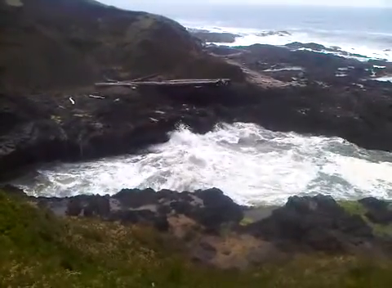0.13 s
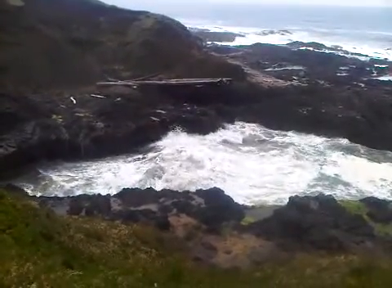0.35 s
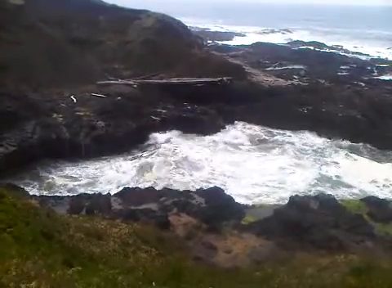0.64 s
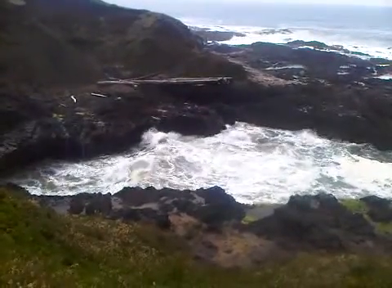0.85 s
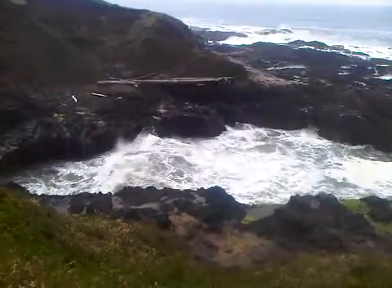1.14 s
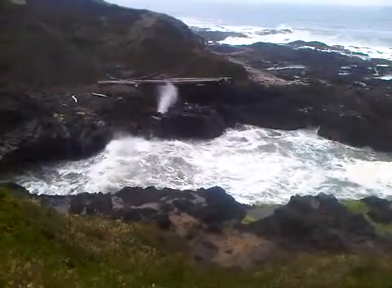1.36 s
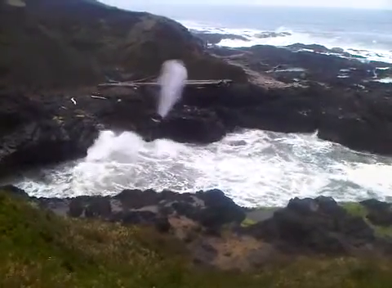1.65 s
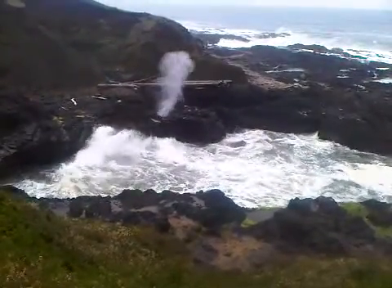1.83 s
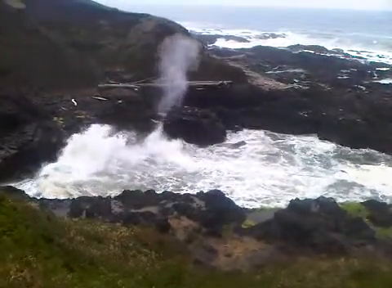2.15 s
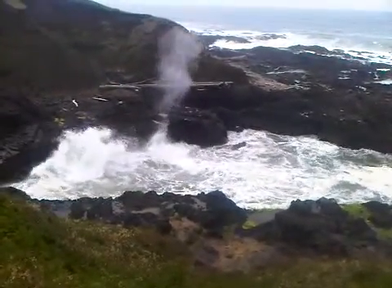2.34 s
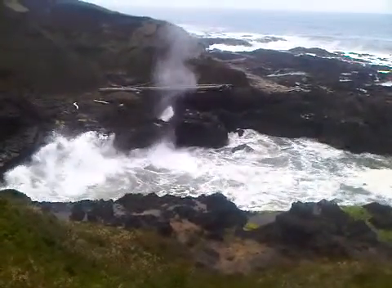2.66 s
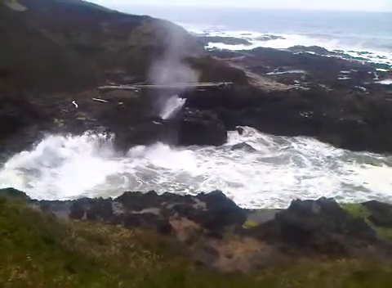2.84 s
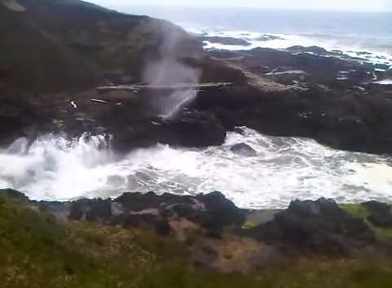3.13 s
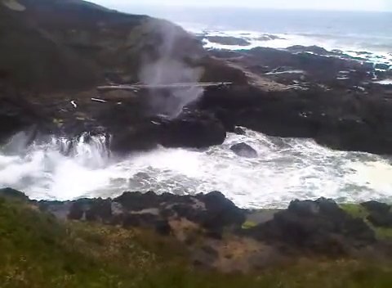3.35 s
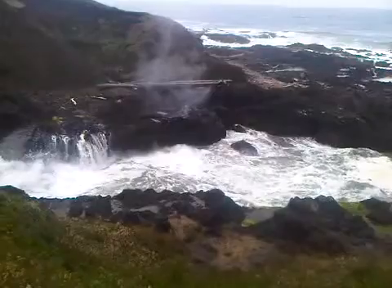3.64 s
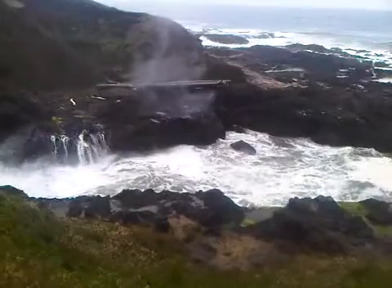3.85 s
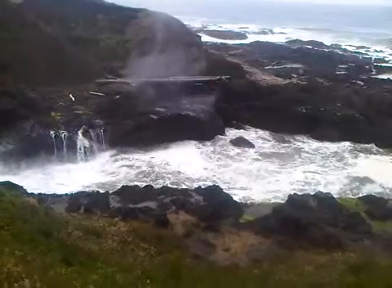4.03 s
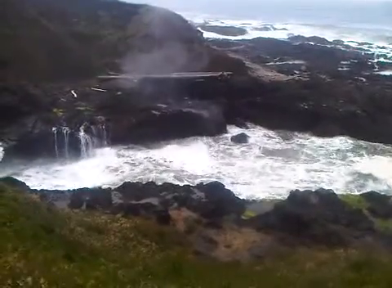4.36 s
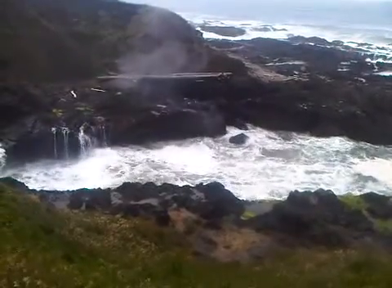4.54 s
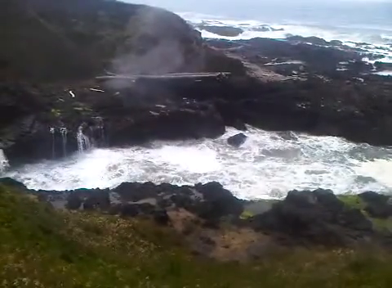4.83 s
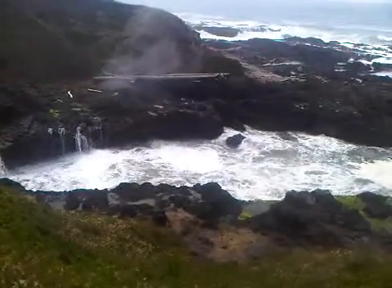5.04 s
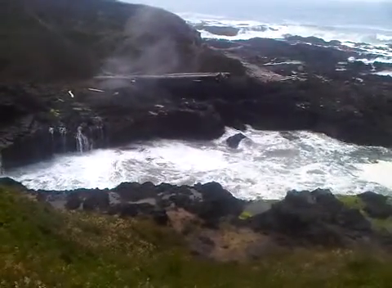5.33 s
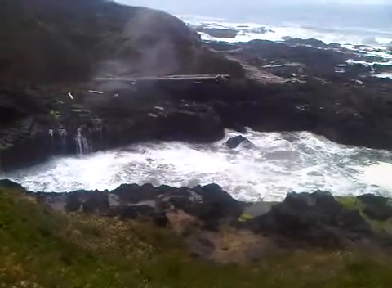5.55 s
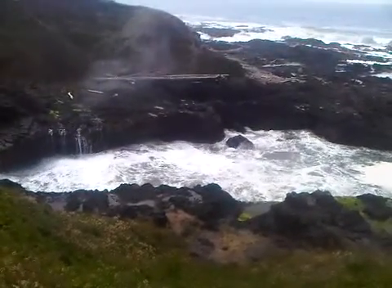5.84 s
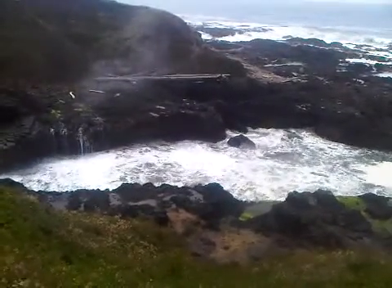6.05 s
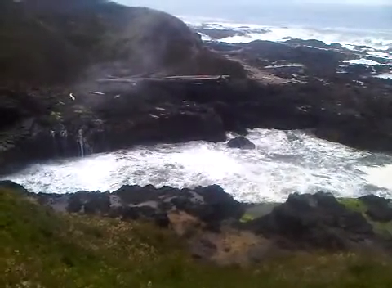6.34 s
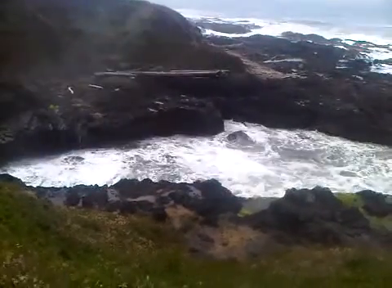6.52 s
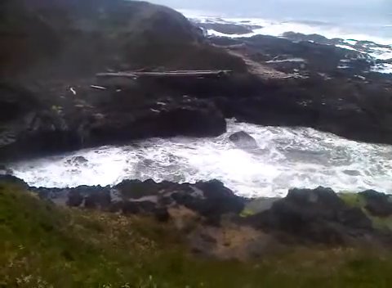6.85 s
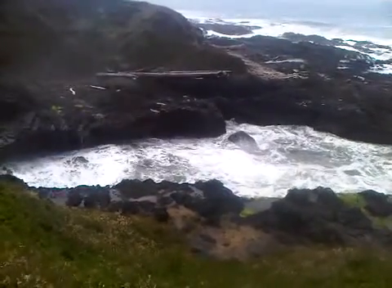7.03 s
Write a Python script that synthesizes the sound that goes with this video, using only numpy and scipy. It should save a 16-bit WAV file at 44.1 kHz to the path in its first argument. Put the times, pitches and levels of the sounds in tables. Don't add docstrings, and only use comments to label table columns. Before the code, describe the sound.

Churning water in a rocky cove, heard from well back: low boom, hollow wash and steady spray hiss. Light wind puffs at first, a wave slap swelling near 1.8 seconds, then brighter spray around 3 to 4 seconds. Hard wind jets thump the exposed pocket-camera microphone from about 2.7 seconds, densest from 4 to 5, easing after 6. The sound is mono, dull on top and slightly grainy.

```python
import sys
import numpy as np
from scipy import signal
from scipy.fft import rfft, irfft, next_fast_len
from scipy.io import wavfile
from scipy.ndimage import uniform_filter1d, map_coordinates

SR = 44100
rng = np.random.default_rng(int(sys.argv[2]) if len(sys.argv) > 2 else 0)


def ratio(d):
    e = np.asarray(d, float) / 20
    return 10 ** e


def put_to_file(sound):
    columns = np.atleast_2d(sound).T
    safe = np.clip(columns, -1, 1)
    whole_steps = np.round(safe * 32767)
    wavfile.write(sys.argv[1], SR, whole_steps.astype(np.int16))


N = 317079
T = np.arange(N) / SR

# time in seconds, spray level in dB.
CHURN = [(0, -64), (.64, -62.5), (1.25, -63.5), (2.0, -61.5), (2.65, -58.5), (3.1, -55.5), (3.4, -56.5),
         (3.65, -59.5), (3.95, -56.5), (4.6, -60.5), (5.15, -62.5), (6.1, -64), (7.19, -65.5)]
# frequency in Hz, level in dB per Hz.
BOOM_COLOUR = [(20, -16), (40, 8), (90, -5), (200, 4), (400, -22.5)]
# frequency in Hz, level in dB per Hz.
WASH_COLOUR = [(60, -31), (150, -9.5), (350, 2.5), (700, -3.5), (1050, 0), (1350, -5), (1650, -6.5),
               (1900, -10.5), (3000, -20), (5000, -35.5)]
# frequency in Hz, level in dB per Hz.
SPRAY_COLOUR = [(800, -25.5), (2000, 0), (2800, 0), (3250, -1.5), (3600, 0), (4400, -1.5), (5100, -4.5),
                (5700, -3), (6400, -6), (7200, -9), (9000, -11.5)]
# time in seconds, level in dB.
BREEZE = [(0, -49), (.14, -52), (1.26, -55), (1.55, -49), (1.78, -42), (1.96, -49.5), (2.38, -52.5),
          (2.76, -44.5), (3.64, -43.5), (3.94, -48), (4.1, -42), (4.75, -42), (4.85, -46), (5.1, -43),
          (5.35, -45.5), (5.8, -42), (6.59, -43.5), (7.19, -48)]
# start in seconds, end in seconds, level in dB, eddy rate in Hz.
JETS = [(0.109, 0.151, -44.5, 140.5), (0.719, 0.762, -44.5, 120.5), (1.332, 1.372, -42, 180.3),
        (1.408, 1.454, -40, 193.1), (1.552, 1.589, -38.5, 183), (2.749, 2.788, -32.5, 231),
        (2.798, 2.838, -30, 165.3), (3.034, 3.052, -40, 279), (3.481, 3.498, -37.5, 260.7),
        (3.503, 3.539, -26, 214.4), (3.904, 3.938, -28.5, 300.2), (3.941, 4.017, -25, 304),
        (4.193, 4.324, -29, 256.1), (4.329, 4.506, -33, 240.5), (4.5, 4.66, -29.5, 165.5),
        (4.662, 4.765, -29, 194.6), (4.813, 4.845, -34, 202.6), (4.853, 4.864, -25, 300.5),
        (4.967, 5.012, -30.5, 228.8), (5.031, 5.068, -28, 220.6), (5.087, 5.104, -28, 268.7),
        (5.803, 5.837, -31, 280.3), (5.834, 5.853, -27, 268.4), (5.865, 5.884, -26.5, 290.1),
        (5.886, 5.908, -40, 260.8), (5.943, 5.962, -41, 333.2), (5.992, 6.027, -44, 328.3),
        (6.063, 6.073, -26, 259.7)]
# time in seconds, peak in dB,
# eddy rate in Hz.
EDDIES = [(0.7365, -28, 122), (0.9435, -32, 177), (1.2797, -31, 145), (1.7014, -24, 213),
          (1.829, -28.5, 221), (3.3663, -24.5, 227), (3.435, -33, 327), (4.062, -24.5, 202),
          (4.112, -30.5, 400), (4.944, -22.5, 230), (5.2134, -34.5, 181.4), (5.33, -35, 165),
          (5.5573, -28.5, 255.7), (5.674, -30, 213), (5.7321, -24.5, 232), (5.754, -32, 396),
          (5.959, -25.5, 400), (5.985, -17.5, 400), (5.9958, -20, 428), (6.0143, -16, 347),
          (6.2696, -34, 277.9), (6.4362, -26.5, 151.7), (6.4519, -27.5, 307), (6.5991, -30.5, 247),
          (6.7652, -29.5, 244), (6.782, -31, 256), (6.89, -29.5, 215), (7.034, -31.5, 214),
          (7.1, -30.5, 293)]
# time in seconds, peak in dB.
SLAMS = [(1.3494, -23.5), (1.4244, -25), (1.4458, -23.5), (1.5567, -24), (2.7645, -20.5), (2.7774, -18.5),
         (2.7899, -21), (2.8064, -17), (3.036, -19.5), (3.512, -20.5), (3.5294, -18), (3.979, -16),
         (4.2214, -21.5), (4.2707, -11), (4.3085, -18.5), (4.4431, -16.5), (4.507, -19.5), (4.7492, -12.5),
         (4.828, -16), (4.9825, -15), (5.012, -24.5), (5.0991, -12.5), (5.8221, -18), (5.844, -18),
         (5.8768, -19), (6.0662, -25.5)]
# time in seconds, peak in dB.
FLICKS = [(2.754, -32.5), (2.838, -31.5), (3.035, -27), (3.225, -35), (3.435, -35.5), (3.513, -19.5),
          (3.907, -22.5), (3.949, -23.5), (3.981, -24.5), (4.22, -29.5), (4.329, -27.5), (4.394, -25),
          (4.475, -32.5), (4.49, -25), (4.507, -21), (4.663, -30.5), (4.854, -28.5), (4.944, -34),
          (5.012, -22.5), (5.098, -30), (5.727, -31.5), (5.787, -34.5), (5.813, -27.5), (5.879, -23.5),
          (5.9, -31), (6.066, -26.5), (6.27, -33.5)]
# frequency as a multiple of eddy rate, level in dB per Hz.
SWIRL_COLOUR = [(.1, -40.5), (.4, -5.5), (.7, 1.5), (1.2, -2), (2, -9), (3.5, -22.5), (6, -35), (12, -57.5),
                (30, -90)]
# start in seconds, end in seconds, pitch in Hz, level in dB.
WHISTLE = (2.24, 2.41, 826, -64)
# time in seconds, peak in dB, pitch in Hz, 60 dB decay in seconds.
CASE_TICK = (6.5755, -30, 4900, .0014)
# start in seconds, end in seconds.
DROPOUT = (6.5926, 6.5965)
# frequency in Hz, gain in dB.
CONVERTER = [(5, -1), (7100, 0), (7500, -4.5), (7800, -12), (8000, -14), (8100, -88.5)]
# start in seconds, shortage from 0 to 1, shortage of every second frame after from 0 to 1.
LEAN_FRAMES = [(.183, .05, .02), (.311, .13, .02), (.951, .12, .02), (1.143, .06, 0), (1.271, .32, 0),
               (1.399, .22, .07), (1.719, .11, .08), (2.359, .45, .03), (2.743, .24, .04),
               (3.191, .08, .06), (3.511, .38, .02), (3.895, .17, .04), (4.215, .23, .15), (4.855, .26, 0),
               (4.983, .3, .11), (5.815, .19, .05), (6.007, .13, .08), (6.263, .43, .16), (7.031, .31, .1)]

CALM_DB = -65.5
FRAME_S, FIRST_EDGE_S = .064, .057


def unit(x):
    return x / np.sqrt(np.mean(x ** 2) + 1e-20)


def curves(rows):
    s, *cols = np.transpose(rows)
    return [np.interp(T, s, c) for c in cols]


def wobble(rate):
    knots = rng.standard_normal(int(N * rate / SR) + 4)
    return map_coordinates(knots, [T * rate])


def coloured(x, points, scale=1):
    m = next_fast_len(len(x) + 8192)
    f, level_db = np.transpose(points)
    log_hz = np.log(np.fft.rfftfreq(m, 1 / SR) + 1)
    gain = ratio(np.interp(log_hz, np.log(f * scale), level_db, -90, -130))
    return unit(irfft(rfft(x, m) * gain, m)[:len(x)])


def patchy(depth_db):
    z = signal.stft(rng.standard_normal(N + 512), nperseg=512)[2]
    field = uniform_filter1d(rng.standard_normal(z.shape), size=5, axis=0)
    field = uniform_filter1d(field, size=12, axis=1)
    return signal.istft(z * ratio(depth_db * unit(field)), nperseg=512)[1][:N]


def gate(start, end, edge):
    return np.clip(np.minimum(T - start, end - T) / edge + .5, 0, 1)


def wave_on_ledge():
    since = T - 1.756
    return np.clip(np.minimum(1 + since / 0.29, 1 - since / 0.31), 0, 1)


def spray_with_mist(spray, churn_db):
    above_mist_hz = signal.butter(N=2, Wn=5060, btype="high", fs=SR, output="sos")
    top = signal.sosfiltfilt(above_mist_hz, spray)
    return spray + (ratio(-1.5 + 0.38 * (churn_db - CALM_DB)) - 1) * top


def surf():
    churn_db, = curves(CHURN)
    slap = wave_on_ledge()
    wash_db = -58 + 0.7 * (churn_db - CALM_DB) + 8 * slap
    spray_db = churn_db + 3.5 * slap
    heave = wobble(5)
    wash_gain = ratio(wash_db + 2.5 + 0.46 * heave + 0.38 * wobble(14))
    wash = wash_gain * coloured(patchy(depth_db=1.0), WASH_COLOUR)
    spray = ratio(spray_db + 1.5 + 0.51 * heave) * coloured(patchy(depth_db=0.75), SPRAY_COLOUR)
    boom = ratio(wash_db - 5.0) * coloured(patchy(depth_db=3.0), BOOM_COLOUR)
    return boom + wash + spray_with_mist(spray, churn_db)


def wind():
    jet_hz = np.full(N, 200.)
    for start, end, db, hz in JETS:
        jet_hz[T > start - .01] = hz
    return breeze() + jets(jet_hz) + thumps(jet_hz) + flicks()


def jets(jet_hz):
    force = np.zeros(N)
    for start, end, db, hz in JETS:
        force = np.maximum(force, ratio(db) * gate(start, end, edge=0.0045))
    return force * turbulence(uniform_filter1d(jet_hz, size=400), lumpy_db=4.0, even=0.52)


def thumps(jet_hz):
    out, t = np.zeros(N), np.arange(-1500, 1500) / SR
    eddies = EDDIES + [(s, db, jet_hz[round(s * SR)]) for s, db in SLAMS]
    for (s, db, hz), turn in zip(eddies, rng.random(len(eddies))):
        shape = np.exp(-(t * hz / 0.59) ** 2)
        swing = np.cos(2 * np.pi * hz * t + 1.1 * (turn - .5))
        sharpness = hz / 700 * np.cos(2 * np.pi * 1.96 * hz * t) * shape ** 2
        out[round(s * SR) - 1500:][:len(t)] -= ratio(db - 4.5) * shape * (swing + sharpness)
    return out


def flicks():
    hz, t = 450, np.arange(-1500, 1500) / SR
    kicks = np.zeros(N)
    for s, db in FLICKS:
        kicks[round(s * SR)] = ratio(db)
    flick = -np.exp(-(t * hz / 0.5) ** 2) * np.cos(2.4 * np.pi * hz * t)
    return signal.fftconvolve(kicks, flick, "same")


def breeze():
    level_db, = curves(BREEZE)
    rate_hz = 150.3 * ratio(.15 * np.clip(level_db + 52, 0, 9))
    return ratio(level_db + 1.62 * wobble(30)) * turbulence(rate_hz, lumpy_db=4, even=0.19)


def turbulence(rate_hz, lumpy_db, even):
    place = np.cumsum(rate_hz / 200)
    lumps = rng.standard_normal(2 * N // 64 + 1).repeat(64)[:2 * N]
    kicks = rng.standard_normal(2 * N) * ratio(lumpy_db * lumps)
    pattern = coloured(kicks, SWIRL_COLOUR, scale=200.3)
    air = map_coordinates(pattern, [np.minimum(place, 2 * N - 2)], order=1)
    swing = np.abs(uniform_filter1d(air ** 2, size=900)) + 1e-3
    return unit(air / swing ** (np.clip(even, 0, 1) / 2))


def slot_whistle():
    start, end, hz, db = WHISTLE
    return ratio(db + 5) * gate(start, end, edge=.03) * np.sin(2 * np.pi * hz * T + .8 * wobble(30))


def case_tick():
    s, db, hz, t60 = CASE_TICK
    t = np.maximum(T - s, 0)
    return -ratio(db + 4.0 - 60 * t / t60) * np.sin(2 * np.pi * hz * t)


def scene():
    return (surf() + wind() + slot_whistle() + case_tick())[None]


def bit_shortage(frames, floor_db, odd_db, lean_db, shortage_db):
    luck = rng.uniform(.6, 1.3, frames)
    step_db = floor_db + odd_db * luck
    for s, shortage, after in LEAN_FRAMES:
        first = round((s - FIRST_EDGE_S) / FRAME_S) + 1
        step_db[first::2] = lean_db + shortage_db * np.sqrt(after * luck[first::2])
        step_db[first + 1::2] = floor_db
        step_db[first] = lean_db + shortage_db * np.sqrt(min(shortage, .36))
    return step_db


def thrifty_camera(x):
    hz, t, z = signal.stft(x, SR, window="cosine", nperseg=706)
    frame = np.floor((t - FIRST_EDGE_S) / FRAME_S).astype(int) + 1
    frames = frame.max() + 1
    size = np.abs(z)
    hiss = uniform_filter1d(np.median(size[(hz > 3000) & (hz < 6500)], axis=0), size=40)
    step_db = bit_shortage(frames, floor_db=-11, odd_db=2.5, lean_db=-10, shortage_db=31)
    bands = rng.standard_normal((len(z) // 3 + 1, frames)).repeat(3, axis=0)[:len(z)]
    colour = (np.median(size, axis=1) / np.median(hiss) + 1e-9)[:, None] ** .22
    step = hiss * np.minimum(colour, 1) * ratio(step_db + 2.8 * bands)[:, frame]
    lines = np.round(size / step - .1) * step * np.exp(1j * np.angle(z))
    fold, k = 128, np.arange(1, 16)[:, None]
    mirror = np.conj(lines[fold - k[:, 0]]) * np.exp(2j * np.pi * 16000 * t)
    lines[fold + k[:, 0]] = ratio(-.6 * k ** 1.5) * mirror
    return signal.istft(lines, SR, window="cosine", nperseg=706)[1][:N]


def top_cut(x):
    return signal.sosfilt(signal.butter(12, 8870, fs=SR, output="sos"), x)


def record(dry):
    x = dry[0] * (1 - gate(*DROPOUT, edge=0.00013))
    x = x / (1 + np.abs(x / .2) ** 4) ** .25
    x = np.std(x) * coloured(x, CONVERTER)
    mix = thrifty_camera(x)[None]
    return top_cut(mix)


dry = scene()
out = record(dry)
put_to_file(out)
```